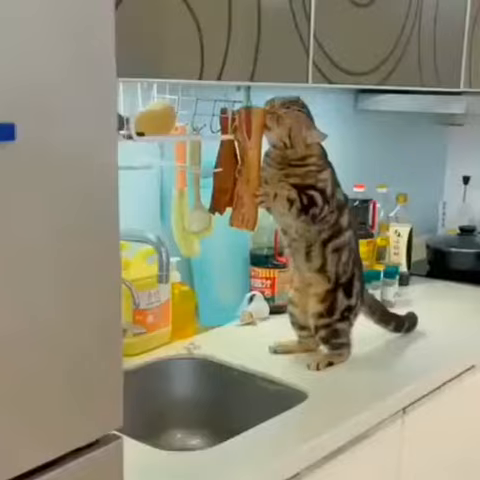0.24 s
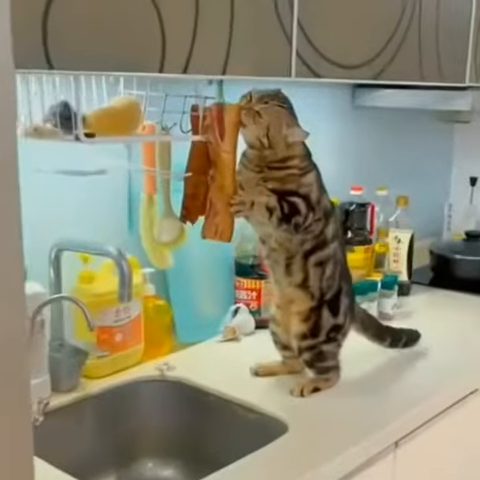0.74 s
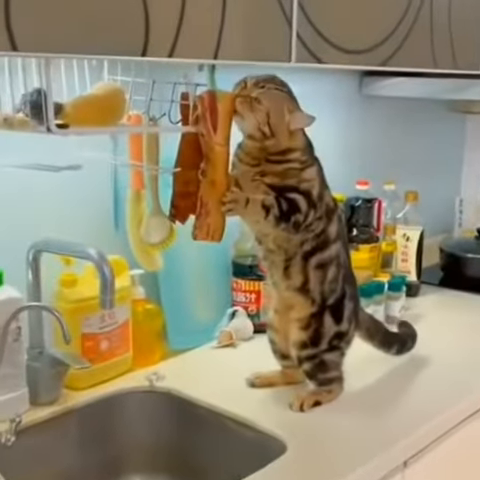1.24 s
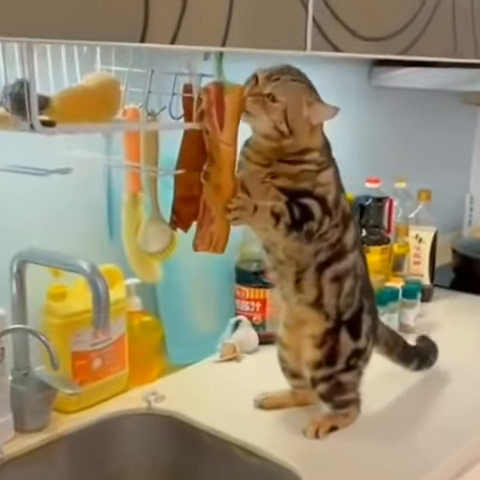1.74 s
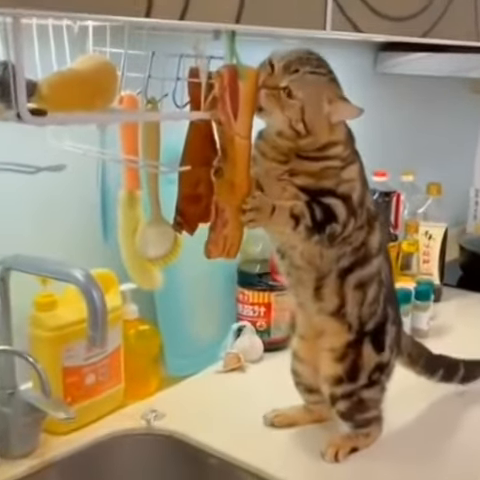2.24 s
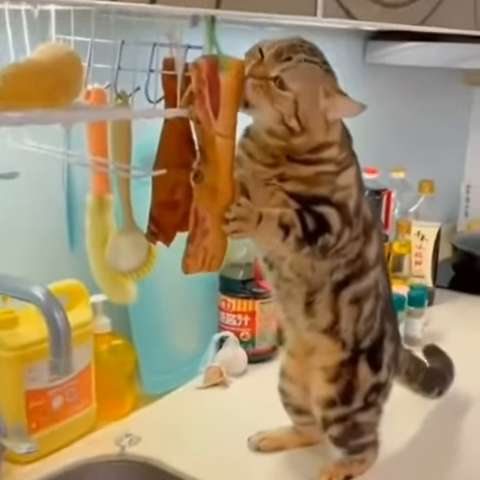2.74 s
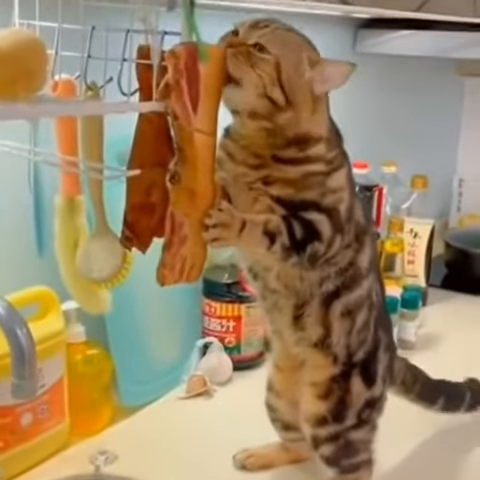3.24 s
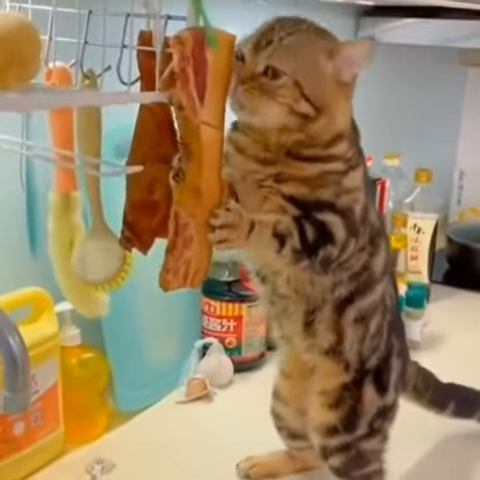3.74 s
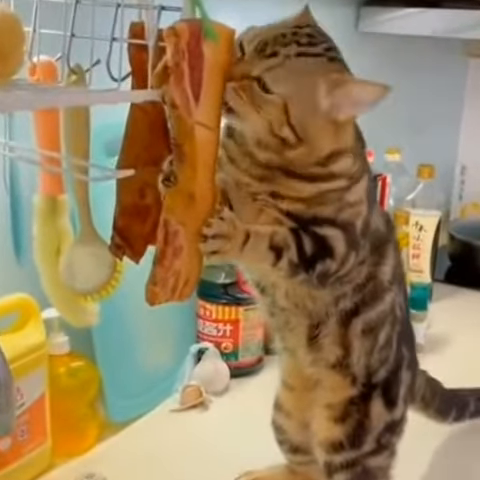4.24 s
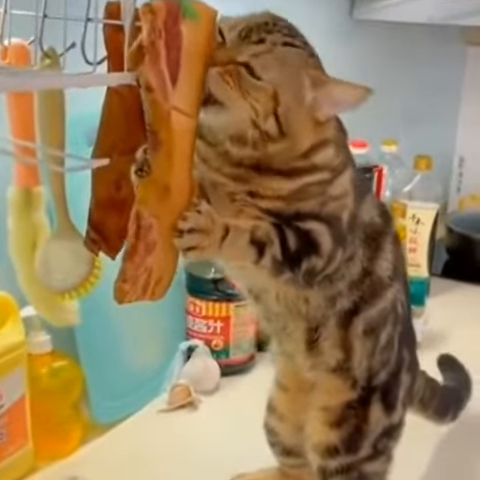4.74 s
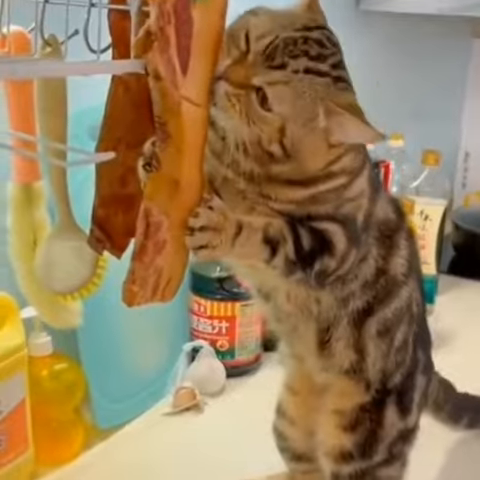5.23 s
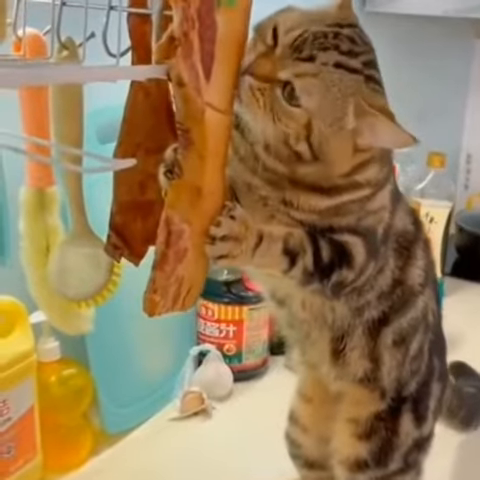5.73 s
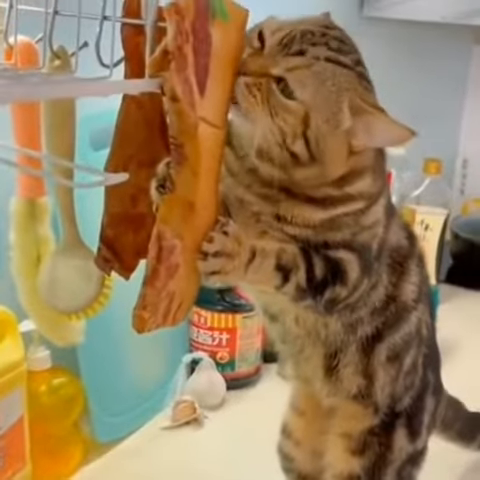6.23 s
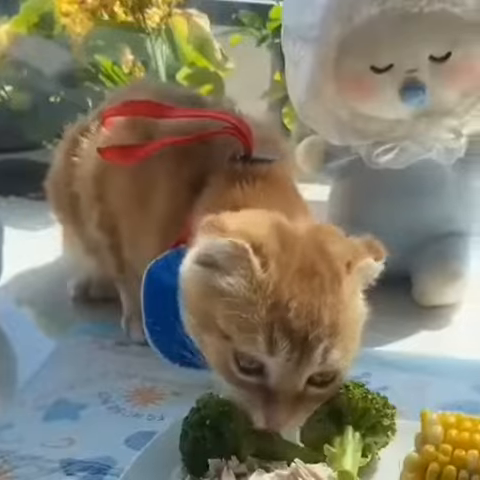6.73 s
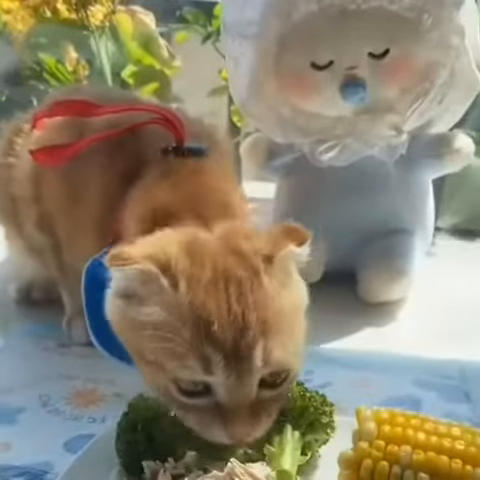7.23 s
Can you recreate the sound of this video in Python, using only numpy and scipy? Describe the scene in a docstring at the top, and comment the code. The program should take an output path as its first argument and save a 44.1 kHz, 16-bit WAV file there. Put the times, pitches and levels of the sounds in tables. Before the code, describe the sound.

A cat snarls briefly, another growls and yowls through a mouthful of meat in a kitchen, then a kitten whines thinly while eating outdoors.

```python
"""Three cats guarding food

Three cats guard their food, one after another, close to a nearly mono microphone. The first snarls briefly.
The second growls and yowls through a mouthful of cured meat in a tiled kitchen corner: pulsing vocal folds,
a fluttering larynx and a jaw that opens as it chews. The third, a kitten in the open air, smacks its food
and lets out a thin falling whine, a few overtones through one mouth resonance, over a low growl.
Noise bursts and clicks make the eating; filtered noise makes the air and a patchy treble hiss."""
import sys
import numpy as np
from scipy import signal
from scipy.fft import rfft, irfft, next_fast_len
from scipy.io import wavfile
from scipy.ndimage import uniform_filter1d

SR = 44100
rng = np.random.default_rng(int(sys.argv[2]) if len(sys.argv) > 2 else 0)


def to_wav(sig):
    """Store sig (one row per channel, or 1-D mono) as 16-bit WAV at the path in sys.argv[1].

    Samples outside -1..1 are clipped; the rate is SR.
    """
    pcm = np.clip(np.atleast_2d(sig), -1, 1) * 32767
    pcm = np.round(pcm).astype(np.int16)
    wavfile.write(sys.argv[1], SR, pcm.T)  # frames by channels


N = 330289
T = np.arange(N) / SR
KITCHEN, OPEN_AIR = (.272, 6.502), (6.563, 7.6)  # start and end of each place, s
EDGE_HZ = 11500  # band limit at the microphone; the voice pulses are about 1 / EDGE_HZ wide

# vocal folds
TAUT_HZ, SLACK_HZ = 310, 220  # between these pitches the folds go slack and the yowl becomes a rattle
SCATTER, LIMP = .085, .2  # slack folds close off the beat (cycles) and alternately strong and weak (share)
FLUTTER_HZ, FLUTTER_SPREAD = 56, .16  # rate of the flutter and its unsteadiness (share)
FLUTTER_BEND = .1  # swing of the folds' timing (cycles at depth 1)
PUSH_FLUTTER = .25  # a full push adds this much flutter depth
RASP = 1.0  # how strongly the flutter chops the edge of the voice
GROWL_RUSH, SNARL_RUSH = .3, .9  # air that passes between the closures

# jaw and mouth of the kitchen cat
ATTACK_S, RELEASE_S = .012, 0.016  # the voice starts just before each cry's curve and dies just after it
OPEN_S, CLOSE_S = 0.067, 0.022  # travel of the jaw
MOUTH_SAG_DB, BARE_DB = 10, 0.5  # through a chew the mouth dulls while the lips draw back
SHUT_MOUTH_DB, SHUT_EDGE_DB = -12.5, -29.5  # leak through a mouthful, relative to the throat curve
PUSH_LIFT, BITE_DROP = .27, .04  # pitch jumps up as the jaw opens and sinks as it bites (shares at full push)
PUSH_S, PUSH_LAG_S, BITE_LEAD_S = .036, .021, .022  # half width; push after opening, bite before shutting
PUSH_CHEST_DB, PUSH_THROAT_DB, BITE_THROAT_DB = -3.5, 4, -2.5  # the push moves weight from chest to throat
RING_WIDTH_HZ, RING_LEVEL_DB = 88, 10  # mouth ring added to the edge, relative to it
VOWEL_SHUT_HZ, VOWEL_WIDTH_HZ = 580, 1050  # the lower mouth resonance climbs from here as the jaw opens
VOWEL_GLIDE = 0.23  # share by which it goes on rising through a chew


def gain_of(db):
    """Decibels to amplitude."""
    return 10 ** (np.asarray(db) / 20)


def evened(x):
    """Scales to rms 1."""
    return x / np.sqrt(np.mean(x ** 2) + 1e-20)


def steadied(x):
    """Holds the rms near 1 while keeping everything faster than a few flutters."""
    power = uniform_filter1d(uniform_filter1d(x ** 2, size=1500), size=1500)
    return x / np.sqrt(abs(power) + 1e-12)


def follow(rows, t):
    """The columns of a curve table at the times t."""
    s, *columns = np.transpose(rows)
    return [np.interp(t, s, c) for c in columns]


def during(t, start, end, fade=0.00055):
    """1 between two times, with short ramps."""
    return np.clip((t - start) / fade, 0, 1) * np.clip((end - t) / fade, 0, 1)


def band(x, low_hz, high_hz, order=4):
    """Band-pass."""
    edges_hz = [low_hz, min(high_hz, SR / 2 - 1)]
    return signal.sosfilt(signal.butter(order, edges_hz, "band", fs=SR, output="sos"), x)


def wander(n, rate_hz):
    """Slow chance with rms near 1: noise that falls steeply above rate_hz."""
    size = next_fast_len(n + SR)
    hz = np.fft.rfftfreq(size, 1 / SR)
    noise = rfft(rng.standard_normal(size))
    return evened(irfft(noise / (1 + (hz / rate_hz) ** 4)))[:n]


def colour(x, spectrum, resonances=()):
    """Causal filter from a smooth spectrum and narrow resonances on top of it."""
    hz = abs(np.fft.fftfreq(8192, 1 / SR))
    f, db = np.transpose(spectrum)
    db = np.interp(np.log(hz + 1), np.log(f + 1), db)
    for centre, width, lift in resonances:
        db = db + lift / (1 + (2 * (hz - centre) / width) ** 2)
    log_gain = np.log(gain_of(np.maximum(db, -100)))
    # the Hilbert transform of the log gain gives the minimum phase
    response = np.exp(np.conj(signal.hilbert(log_gain)))
    taps = np.fft.ifft(response).real[:len(hz) // 2]
    return signal.oaconvolve(x, taps)[:len(x)]


def resonate(x, hz, width_hz):
    """A resonance of gain 1 that follows the curve hz: shift to 0 Hz, smooth, shift back."""
    turn = np.exp(2j * np.pi * np.cumsum(hz * np.ones(len(x))) / SR)
    r = np.exp(-np.pi * width_hz / SR)
    return 2 * (turn * signal.lfilter([1 - r], [1, -r], x / turn)).real


def add(mix, s, sound):
    """Adds a sound at a time."""
    part = mix[max(round(s * SR), 0):][:len(sound)]
    part += sound[:len(part)]


def air(spectrum, level_db):
    """Background rumble and hiss that swells slowly."""
    swell_db = 1.5 * wander(N, 4)
    return evened(colour(rng.standard_normal(N), spectrum)) * gain_of(level_db + swell_db)


def echo(x, t60, wet_db):
    """A short tail from hard walls: sparse random reflections that die exponentially."""
    t = np.arange(SR // 2) / SR
    taps = rng.standard_normal(len(t)) * (rng.random(len(t)) < 2000 / SR) * (t > .004)
    tail = band(taps * gain_of(-60 * t / t60), 500, 5000, order=2)
    return gain_of(wet_db) * signal.oaconvolve(x, tail / np.linalg.norm(tail))[:N]


def grainy_hiss(levels, spectrum, grain_db, per_s):
    """Dense tiny clicks of uneven size, coloured into a hiss that comes in surges."""
    size = gain_of(grain_db * np.minimum(rng.exponential(1, N), 4))
    clicks = size * rng.standard_normal(N) * (rng.random(N) < per_s / SR)
    surge_db = 3.5 * wander(N, 16.0)
    return steadied(colour(clicks, spectrum)) * gain_of(follow(levels, T)[0] + surge_db)


def smack(peak_db, hz, decay_s, spread):
    """A snap of teeth or lips: a burst of noise that dies within milliseconds."""
    t = np.arange(SR // 20) / SR
    burst = rng.standard_normal(len(t)) * np.exp(-t / decay_s)
    snap = band(burst, hz / (1 + spread), hz * (1 + spread), order=2)
    return gain_of(peak_db) * snap / abs(snap).max()


def tooth_click(peak_db, hz):
    """Teeth meet: one sharp crack and a very short ring."""
    t = np.arange(SR // 20) / SR
    crack = band(1. * (t == 0), hz / 2, hz * np.sqrt(2), order=4)
    # the ring starts 5 dB under the crack and falls 60 dB in 14 ms
    ring = gain_of(-5 - 60 * t / .014) * np.sin(2 * np.pi * hz * t)
    click = crack / abs(crack).max() + ring
    return gain_of(peak_db) * click / abs(click).max()


def soft_tone(peak_db, hz, length_s):
    """A sine that swells and fades in one smooth arch."""
    t = np.arange(0, length_s, 1 / SR)
    return gain_of(peak_db) * np.hanning(len(t)) * np.sin(2 * np.pi * hz * t)


def eating():
    """Smacks, clicks of teeth, squelches and a few soft bumps."""
    # smacks and bites: t/s, peak level/dB, centre f/Hz
    smacks = [(1.1442, -31.5, 2680), (2.0636, -29, 1947), (2.1826, -32.5, 2110), (3.703, -34, 1650),
              (3.882, -40, 2605), (3.986, -32.5, 1570), (4.087, -36.5, 2330), (4.206, -34, 2100),
              (4.922, -33.5, 2044), (5.1379, -28, 2160), (5.6838, -30, 1850), (6.13, -24, 1666),
              (6.8877, -28, 3340)]
    # dry clicks of the kitten's teeth: t/s, peak level/dB, centre f/Hz
    teeth = [(6.639, -28, 4220), (6.666, -27.5, 3120), (6.714, -30, 3270), (7.2605, -10.5, 2480)]
    # wet squelches of the food: t/s, peak level/dB, centre f/Hz
    squelches = [(2.762, -46.5, 5900), (2.853, -35.5, 5750), (3.246, -48, 5503), (3.331, -39, 5730),
                 (3.986, -42, 6700), (5.786, -42, 7200), (6.374, -39.5, 7030), (7.2198, -35.5, 4460)]
    # soft bumps: t/s, peak level/dB, f/Hz, length/s
    bumps = [(0.865, -30, 77.7, 0.13), (3.566, -20, 74.8, 0.08), (6.549, -37, 85.5, 0.043),
             (7.074, -31.5, 92, 0.029)]
    out = np.zeros(N)
    for s, db, hz in smacks:
        add(out, s, smack(db, hz, decay_s=0.013, spread=0.34))
    for s, db, hz in teeth:
        add(out, s, tooth_click(db, hz))
    for s, db, hz in squelches:
        add(out, s, smack(db, hz, decay_s=0.022, spread=0.18))
    for s, db, hz, length in bumps:
        add(out, s, soft_tone(db, hz, length))
    return out


def whine(rows, mouth_hz, width_hz, jitter):
    """A thin wavering voice whose few overtones pass one mouth resonance."""
    t = np.arange(rows[0][0], rows[-1][0], 1 / SR)
    hz, db = follow(rows, t)
    phase = 2 * np.pi * np.cumsum(hz * (1 + jitter * wander(len(t), 110))) / SR
    tone = np.zeros(len(t))
    for k in range(1, 5):
        mouth = 1 / np.hypot(1, (k * hz - mouth_hz) / width_hz)
        tone += np.sin(k * phase) / k ** 2.25 * mouth
    waver_db = 2.3 * wander(len(t), 110)
    return t[0], steadied(tone) * gain_of(db + waver_db) * during(t, t[0], t[-1])


def kitten():
    """A nearly pure whine that twice splits in two, over a lumpy low growl."""
    # pitch and loudness of the whine: t/s, f/Hz, level/dB
    whine_curve = [(7.16, 732, -53), (7.176, 685, -34.5), (7.19, 561, -30), (7.208, 593, -40),
                   (7.232, 601, -31.5), (7.248, 783, -33.5), (7.294, 769, -33), (7.31, 568, -37.5),
                   (7.335, 484, -35), (7.362, 468, -45), (7.388, 417, -31.5), (7.402, 380, -36),
                   (7.416, 382, -31), (7.432, 417.6, -40.5), (7.465, 425, -31.5), (7.49, 417, -37)]
    # swell of the low growl: t/s, level/dB (before the 1.5 dB added below)
    growl_curve = [(7.1, -51), (7.21, -46), (7.234, -33.5), (7.48, -35)]
    # second brief tone beside the whine: t/s, length/s, f/Hz, peak level/dB
    splits = [(7.188, 0.041, 671, -25.5), (7.295, 0.03, 672, -25)]
    growl_hz = 103 * (1 + 0.169 * wander(N, 57.4))
    lumps = gain_of(12.0 * wander(N, 18.0))
    growl = steadied(np.sin(2 * np.pi * np.cumsum(growl_hz) / SR) * lumps)
    growl_gain = gain_of(follow(growl_curve, T)[0] + 1.5)
    out = growl * growl_gain * during(T, growl_curve[0][0], OPEN_AIR[1])
    add(out, *whine(whine_curve, mouth_hz=796, width_hz=120, jitter=0.01))
    for s, length, hz, db in splits:
        add(out, s, soft_tone(db, hz, length))
    return out


def cry(t, hz, gains, push, vowel, ring, spectrum, resonances, throat_low_hz, trim_db, rush):
    """Folds pulse at the pitch while a slower flutter of the larynx chokes them and bends their timing."""
    # state of the vocal folds: t/s, roughness [0-1], flutter depth [0-1] (before pushes)
    folds = [(0,.55,.05),(.16,.35,.05),(.35,.55,.4),(.5,.3,.15),(.7,.4,.4),(1,.27,.3),(1.3,.45,.3),(1.42,.22,.42),(1.55,.5,.45),(1.64,.2,.45),(1.75,.25,.5),(1.84,.5,.45),(1.95,.24,.36),(2.2,.5,.45),(2.5,.34,.13),(3.25,.32,.13),(3.65,.55,.3),(4.2,.48,.22),(4.55,.36,.45),(4.65,.5,.5),(4.8,.28,.42),(5.45,.5,.25),(5.6,.32,.45),(5.95,.4,.35),(6.2,.42,.22)]
    # treble of the voice against the rest of its edge: t/s, level/dB
    treble = [(1.62, -5.5), (1.71, 3), (1.8, -5), (4.27, 2), (4.45, -7.5), (5.3, -1.5), (6.4, -5)]
    n = len(t)
    rough, depth = follow(folds, t)
    depth = np.minimum(depth + PUSH_FLUTTER * push, .5)
    flutter = 2 * np.pi * np.cumsum(FLUTTER_HZ * (1 + FLUTTER_SPREAD * wander(n, 25.8))) / SR
    jitter = .11 * rough * wander(n, 110)
    # the folds run slowest at the crest of each flutter
    turns = np.cumsum(hz * (1 + jitter)) / SR - FLUTTER_BEND * depth * np.sin(flutter)
    choke = 1 - 1.8 * depth * np.sin(flutter / 2) ** 4
    strength = choke * gain_of(3.8 * rough * wander(n, 90))
    chest = band(np.sin(2 * np.pi * turns) * strength, 131, 580, order=3)

    # each closure is a sharp pulse of uneven force followed by a puff of turbulence
    slack = np.clip((TAUT_HZ - hz) / (TAUT_HZ - SLACK_HZ), 0, 1)
    closure = turns + SCATTER * slack * wander(n, 75)
    off_closure = closure - np.round(closure)
    pulses = np.sinc(off_closure * EDGE_HZ / hz) * gain_of(3.5 * rough * wander(n, 200))
    puffs = (rush + np.exp(-(closure % 1) / .25)) * rng.standard_normal(n)
    limping = 1 + LIMP * slack * np.cos(np.pi * closure)
    drive = ((1 - rough) * evened(pulses) + rough * evened(puffs)) * strength * limping
    voice = colour(drive, spectrum, resonances)

    # the throat sounds even through a mouthful; the mouth needs an open jaw, the edge bared teeth
    throat = band(voice, throat_low_hz, 770)
    mouth = band(voice, 704, 1754)
    edge = band(voice, 1804, 2490, order=3)
    edge = edge + gain_of(follow(treble, t)[0]) * band(voice, 2610, 13000, order=5)
    # moving resonances: vowel is (Hz, width Hz) and passed twice, ring is (Hz, width Hz, level dB)
    mouth = resonate(resonate(mouth, *vowel), *vowel)
    edge = edge + gain_of(ring[2]) * resonate(edge, *ring[:2])
    edge = edge * (1 + RASP * depth * np.cos(flutter))  # the voice rasps once in each flutter
    out = np.zeros(n)
    for part, gain, trim in zip((chest, throat, mouth, edge), gains, trim_db):
        out += steadied(part) * gain * gain_of(trim)
    return t[0], out * during(t, t[0], t[-1])


def snarling_cat():
    """One short harsh snarl, full of rushing air and thickened by a small room."""
    # the snarl: t/s, f/Hz, then level/dB before trim of chest, throat, open mouth, bared-teeth edge
    snarl = [(0.0, 142, -25, -35, -26.5, -35.5), (0.046, 134.4, -38, -31.5, -36, -42.5),
             (0.106, 151.6, -25.5, -43, -35.5, -42), (0.161, 186.6, -32.5, -45, -52, -51)]
    # filter of its voice: f/Hz, level/dB
    snarl_voice = [(180, -35), (300, 6), (399, -0.5), (1240, -10), (2100, -23), (3660, -22), (11000, -24)]
    out = np.zeros(N)
    t = np.arange(snarl[0][0], snarl[-1][0], 1 / SR)
    hz, *levels_db = follow(snarl, t)
    vowel = (np.linspace(1050, 1500, len(t)), 750)
    ring = (3500, 400, -9)
    trim_db = (-0.89, -0.37, -1.8, -3.4)
    add(out, *cry(t, hz, gain_of(levels_db), 0, vowel, ring, snarl_voice, [],
                  throat_low_hz=284, trim_db=trim_db, rush=SNARL_RUSH))
    return (out + echo(out, t60=.07, wet_db=-6.5)) * during(T, t[0], t[-1])


def jaw(t):
    """Each chew, from a push to a bite, opens the mouth, lifts its vowel and bares the teeth."""
    # chews: t/s, held open/s, open mouth level/dB, bared-teeth edge level/dB (both mid-chew, before trim),
    # push of the voice [0-1], vowel f/Hz (mid-chew)
    chews = [(0.313,0.055,-47.5,-44.5,0.17,1000),(.537,0.17,-42.5,-50.5,0.19,950),(0.797,0.12,-36,-44,0.37,1158),(1.084,0.025,-36.5,-45,0.13,1160),(1.152,0.028,-39.5,-32,0.05,1120),
             (1.353,0.16,-35.5,-42,0.15,1110),(1.619,.16,-33,-38.5,0.09,972),(1.899,0.16,-41.5,-44.5,0.16,971),
             (2.137,0.044,-42.5,-50,0,1160),(2.383,0.091,-39,-48,1,1090),(2.575,0.15,-34.5,-43.5,0.87,1154),(2.829,.12,-37,-48,0.86,1187),(3.05,0.15,-37.5,-48,0.82,1299),(3.315,0.15,-37,-44.5,1,1290),(3.576,0.12,-33,-47,0.94,1190),
             (4.067,0.12,-73,-51.5,0.03,1020),(4.206,0.11,-41.5,-39,0.02,1010),(4.424,0.16,-32.5,-37.5,0.18,1070),(4.595,0.022,-30,-59,0,740),(4.716,0.16,-33,-44.5,0.02,973),
             (5.09,0.051,-36.5,-42,0.13,1010),(5.238,0.19,-33.5,-39,0.07,990),(5.553,0.14,-44.5,-52.5,0.05,961),(5.791,0.089,-56.5,-43.5,0.18,1297),(6.095,0.12,-38.5,-42,0.23,1400),(6.373,0.064,-35.5,-37,0.02,1450)]
    mouth, edge, push, bite, vowel = np.zeros((5, len(t)))
    for s, held, mouth_db, edge_db, effort, vowel_hz in chews:
        opened = np.clip(.5 + (t - s) / OPEN_S, 0, 1)
        not_shut = np.clip(.5 + (s + held - t) / CLOSE_S, 0, 1)
        opening = opened * not_shut
        progress = np.clip((t - s) / held, 0, 1) - .5
        mouth += opening * gain_of(mouth_db - MOUTH_SAG_DB * progress)
        edge += opening * gain_of(edge_db + BARE_DB * progress)
        vowel += opening * (vowel_hz * (1 + VOWEL_GLIDE * progress) - VOWEL_SHUT_HZ)
        push += effort * np.exp(-((t - s - PUSH_LAG_S) / PUSH_S) ** 4)
        bite += effort * np.exp(-((t - s - held + BITE_LEAD_S) / PUSH_S) ** 2)
    return mouth, edge, push, bite, VOWEL_SHUT_HZ + vowel


def chewed(rows):
    """One cry shaped by chewing: times, pitch, gains (chest, throat, mouth, edge), push, resonances."""
    # ring of the mouth, higher as the lips close over the meat: t/s, f/Hz
    mouth_ring = [(.35, 2160), (1.4, 2036), (1.66, 2050), (1.76, 1947), (1.86, 2150), (2.0, 1977),
                  (2.62, 2160), (4.3, 2165), (4.45, 2090), (4.57, 2230), (4.65, 2492), (4.8, 2106),
                  (5.3, 2116), (6.42, 1960)]
    t = np.arange(rows[0][0] - ATTACK_S, rows[-1][0] + RELEASE_S, 1 / SR)
    hz, chest_db, throat_db = follow(rows, t)
    mouth, edge, push, bite, vowel_hz = jaw(t)
    chest = gain_of(chest_db + PUSH_CHEST_DB * push)
    throat = gain_of(throat_db + PUSH_THROAT_DB * push + BITE_THROAT_DB * bite)
    mouth = np.hypot(mouth, gain_of(throat_db + SHUT_MOUTH_DB))
    edge = np.hypot(edge, gain_of(throat_db + SHUT_EDGE_DB))
    envelope = np.clip(np.minimum((t - t[0]) / ATTACK_S, (t[-1] - t) / RELEASE_S), 0, 1)
    gains = envelope * np.array([chest, throat, mouth, edge])
    pitch_hz = hz * (1 + PUSH_LIFT * push - BITE_DROP * bite)
    vowel = (vowel_hz, VOWEL_WIDTH_HZ)
    ring = (follow(mouth_ring, t)[0], RING_WIDTH_HZ, RING_LEVEL_DB)
    return t, pitch_hz, gains, push, vowel, ring


def kitchen_cat():
    """Growls climb into yowls and sink back while the jaw works; the last cries are heard from close by."""
    # one curve a cry: t/s, f/Hz, chest level/dB, throat level/dB (before chewing and trim)
    cries = [
        [(.32,201.4,-28,-34.5),(.35,184.9,-22.5,-41.5),(.385,180,-35,-47),(.44,148,-29,-39.5),(.512,184.1,-19,-40),(.555,237.7,-31,-39),(.73,227.9,-27,-33),(.86,247.7,-28.5,-38.5),(1.04,252.8,-30,-32.5),(1.09,289,-34.5,-43),(1.135,214.6,-31.5,-54)],
        [(1.18,190,-30,-38.5),(1.228,145.3,-28.5,-34.5),(1.335,170,-22.5,-33.5),(1.365,247.8,-27.5,-34),(1.42,294.7,-35.5,-33.5),(1.5,246.4,-30,-31),(1.575,238.3,-28.5,-29.5),(1.64,346.7,-33,-37),(1.72,333.7,-36,-30.5),(1.82,316.3,-30,-26.5),(1.93,339.4,-30.5,-33),(2.035,288.2,-36,-32.5),(2.07,200.8,-34.5,-51)],
        [(2.152,187.5,-22,-35),(2.19,189,-28,-53),(2.26,180.5,-24,-36.5),(2.34,152,-24.5,-38),(2.43,194.5,-19.5,-34.5),(2.52,187.3,-19.5,-33),(2.66,204.1,-21.5,-31.5),(3.0,191.8,-20.5,-33.5),(3.24,179.9,-16,-31),(3.3,173.5,-17.5,-34),(3.42,169.3,-19,-34),(3.51,183.6,-15,-30),(3.72,186.8,-26.5,-38)],
        [(4.08,183.7,-26.5,-42),(4.25,159.3,-20.5,-34),(4.35,151.6,-24.5,-32.5),(4.41,176.3,-17.5,-30),(4.46,248.3,-26,-27.5),(4.54,274.7,-29.5,-27),(4.615,253.7,-24.5,-23.5),(4.68,247,-26,-28),(4.71,327.1,-28,-30.5),(4.88,331.7,-30.5,-28.5),(4.93,214.8,-29.5,-41)],
        [(5.025,181.7,-22.5,-34),(5.05,165.6,-25.5,-42),(5.25,176.2,-19.5,-28),(5.32,208.6,-24,-32),(5.38,170.3,-20,-32),(5.505,179.5,-20,-30),(5.575,331,-32,-29),(5.62,329.2,-27.5,-33),(5.65,178.8,-30,-33.5),(5.69,169,-26,-42.5)],
        [(5.735,172.2,-25,-44),(5.765,157,-32,-42.5),(5.835,177.4,-22.5,-44),(5.93,175.1,-24.5,-36.5),(6.05,180.1,-24,-32),(6.09,194.7,-21.5,-30),(6.14,173.6,-19.5,-35.5),(6.22,196.4,-20.5,-31.5),(6.3,192.4,-18,-29.5),(6.345,208.9,-26.5,-26.5),(6.405,174.9,-19.5,-33),(6.495,179.8,-20.5,-31)],
    ]
    # filter of its voice: f/Hz, level/dB
    voice = [(180, -58.5), (300, 11.5), (422, -5), (515, -1), (675, -8.5), (801, -13), (991, -9),
             (1260, -16), (1380, -14), (1730, -17.5), (2110, -26.5), (3180, -37), (4400, -43), (6800, -47),
             (11700, -82.5)]
    # resonances of the corner between wall, worktop and cupboard, from afar: f/Hz, width/Hz, lift/dB
    corner_far = [(508,37,6),(705,91,-9),(809.6,42,8),(1133,46,9)]
    # the same corner from close by: f/Hz, width/Hz, lift/dB
    corner_near = [(471,64,6),(665,150,-7.5),(813,43,10),(965,48,2.5),(1145,42,7),(1400,100,2)]
    out = np.zeros(N)
    for rows in cries:
        corner = corner_far if rows[0][0] < 5 else corner_near  # the near cries begin after 5 s
        add(out, *cry(*chewed(rows), voice, corner, throat_low_hz=360.0,
                      trim_db=(1.0, 0.82, 0.23, 0.34), rush=GROWL_RUSH))
    return out


def outdoors():
    """The kitten in the open air, with a grainy rustle and the air around it."""
    # grainy rustle around the kitten: t/s, level/dB
    rustle_curve = [(6.57, -116), (6.8, -51.5), (7.3, -56.5), (7.38, -46.5), (7.49, -49)]
    # shape of the outdoor background: f/Hz, relative level/dB
    outdoor_air = [(12, -58), (20, -1), (92, 3.5), (153, -5.5), (395, -12.5), (2000, -25), (4030, -21),
                   (11000, -47.5)]
    rustle_spectrum = [(1300, -4.0), (2800, 1.5), (5000, -7.0), (11000, -8.0)]  # f/Hz, relative level/dB
    rustle = grainy_hiss(rustle_curve, rustle_spectrum, grain_db=0.5, per_s=6900)
    return kitten() + rustle + air(outdoor_air, level_db=-43.5)


def indoors():
    """The kitchen cat with the echo of its corner, a patchy treble hiss and the room's air."""
    # patchy treble hiss under the cries: t/s, level/dB
    hiss_curve = [(.3, -62.5), (.7, -71.5), (.85, -58.5), (1.06, -66), (1.14, -48), (1.22, -62.5),
                  (1.35, -82), (1.75, -68), (2.0, -54.5), (2.15, -58.5), (3.5, -58), (3.9, -54.5),
                  (4.33, -54), (4.45, -77), (4.6, -72), (4.72, -51.5), (5.3, -57), (6.05, -55), (6.5, -63)]
    # shape of the room's background: f/Hz, relative level/dB
    room_air = [(12, -39.5), (20, 2.5), (44, -0.5), (66, -8), (97, -23), (117, -11.5), (872, -36),
                (1730, -29), (11000, -67)]
    hiss_spectrum = [(1500, -3.5), (3000, -3.5), (4500, 0.5),
                     (6500, -4.0), (8000, -10), (11000, -18)]  # f/Hz, relative level/dB
    cat = kitchen_cat()
    patchy_hiss = grainy_hiss(hiss_curve, hiss_spectrum, grain_db=0.0, per_s=6500)
    return cat + echo(cat, t60=.11, wet_db=-8) + patchy_hiss + air(room_air, level_db=-39)


def scene():
    """Three places in turn with brief gaps in the air between them; the eating lies over all."""
    kitchen = indoors() * during(T, *KITCHEN)
    open_air = outdoors() * during(T, *OPEN_AIR)
    mix = snarling_cat() + kitchen + open_air + eating()
    return np.array([mix, mix])


def record(dry):
    """The two channels differ only by a hiss that follows the treble; then the band limit."""
    treble = np.sqrt(abs(uniform_filter1d(band(dry[0], 3300, 9800) ** 2, size=120)))
    hiss = evened(band(rng.standard_normal(N), 3000, 7500, order=2))
    side = gain_of(-8.5) * treble * hiss
    taps = signal.firwin(255, EDGE_HZ, window=("kaiser", 9), fs=SR)
    return signal.oaconvolve(dry + np.outer([1, -1], side), taps[None], "same")


dry = scene()
out = record(dry)
to_wav(out)
```